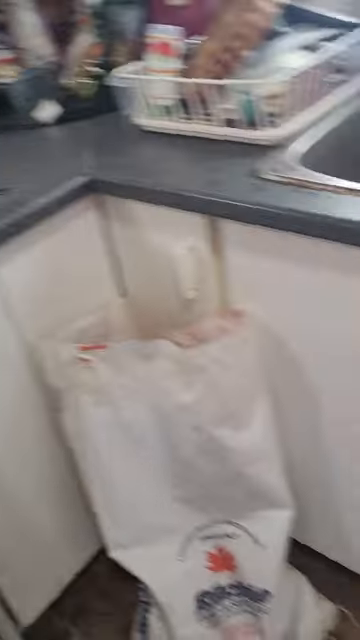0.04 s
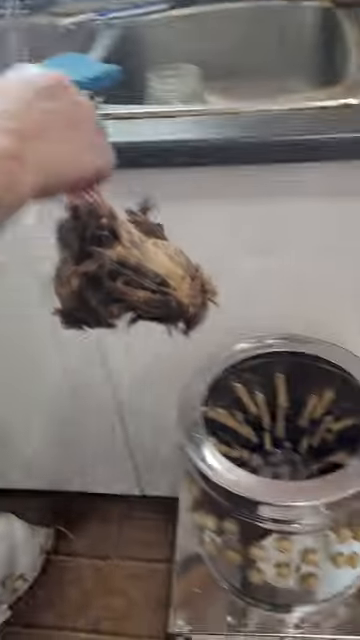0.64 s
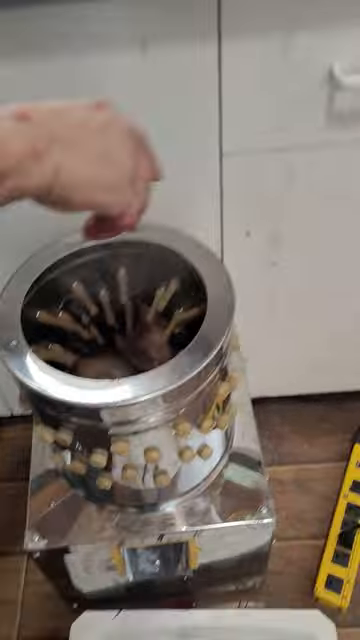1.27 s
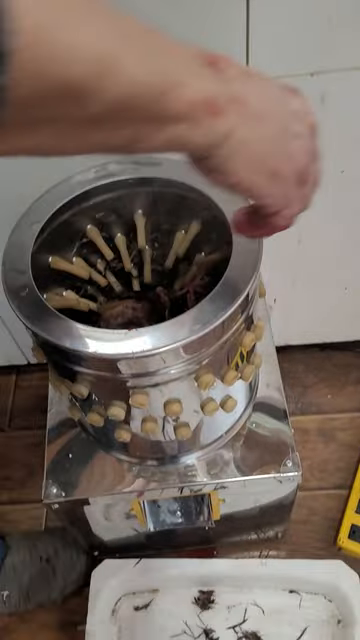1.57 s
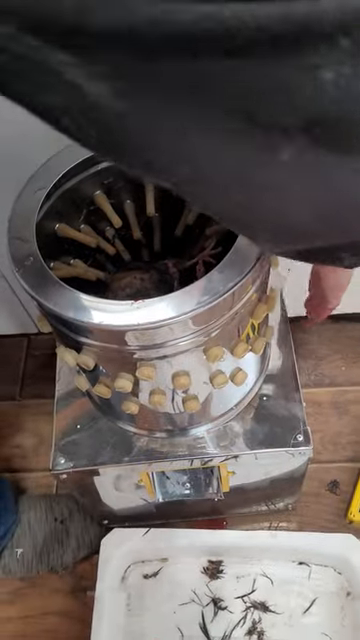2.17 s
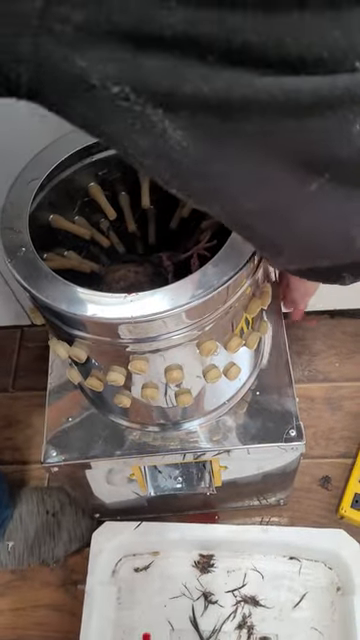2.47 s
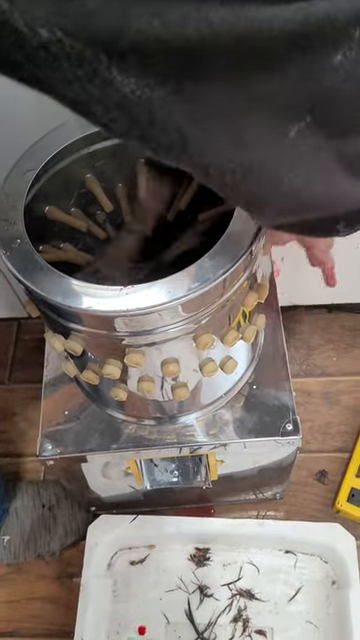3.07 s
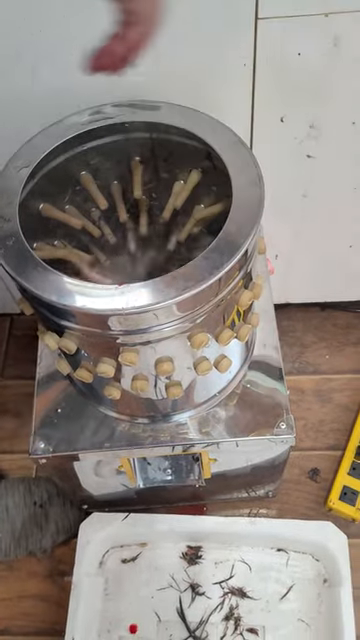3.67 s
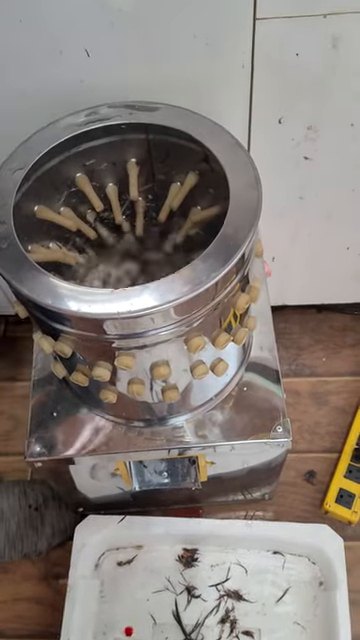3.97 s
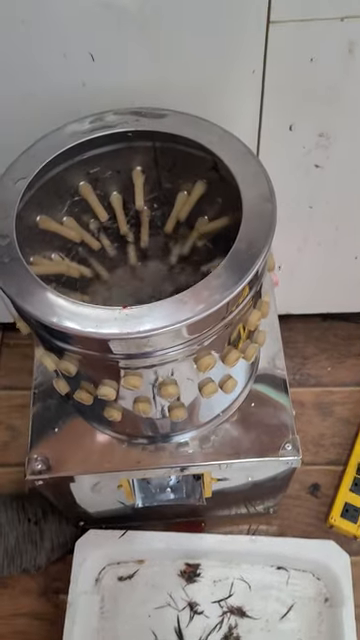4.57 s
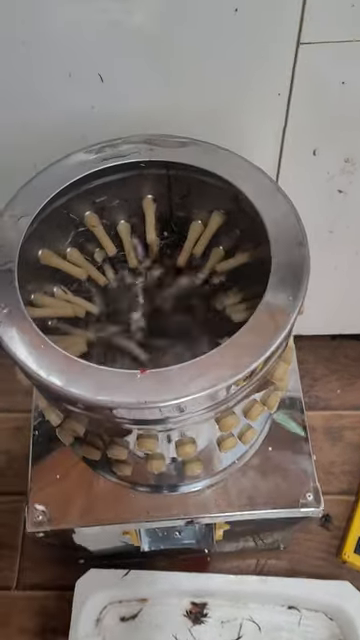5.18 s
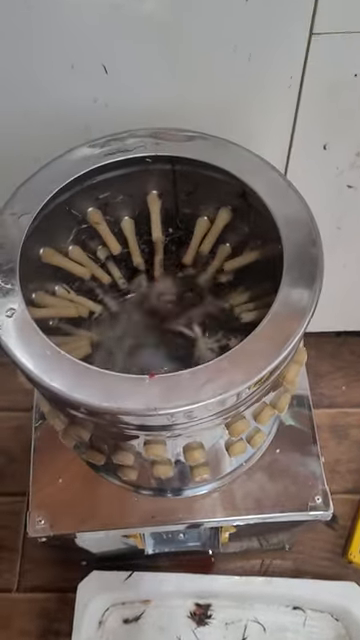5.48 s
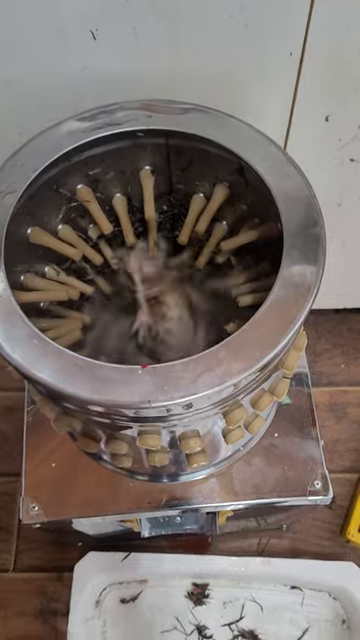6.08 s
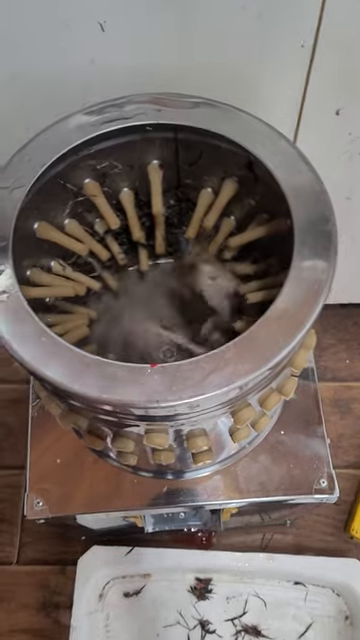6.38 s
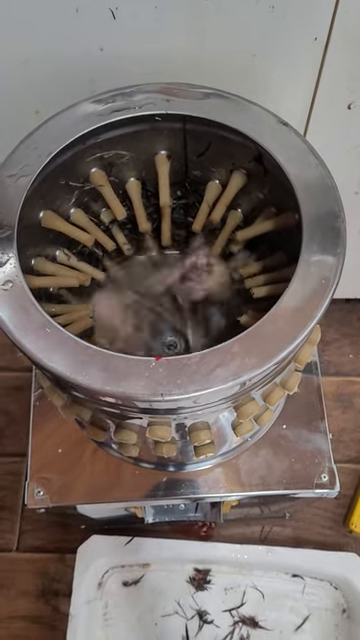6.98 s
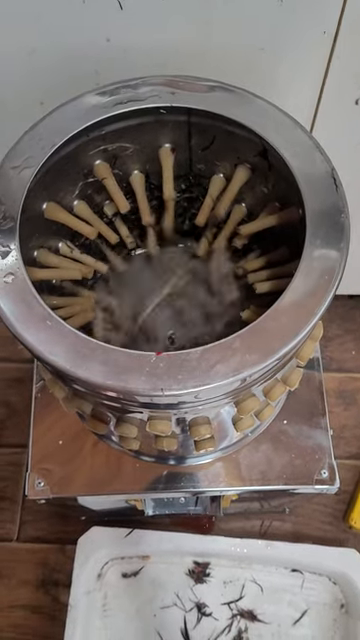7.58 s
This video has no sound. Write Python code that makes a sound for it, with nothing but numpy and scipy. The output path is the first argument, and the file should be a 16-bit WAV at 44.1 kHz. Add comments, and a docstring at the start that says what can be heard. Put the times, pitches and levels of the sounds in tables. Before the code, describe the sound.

From the start, a kitchen tap runs softly into a steel sink, a splashy hiss with low drumming and a few drip ticks. Between about 1 and 2.6 seconds come soft knocks and foot shuffles as a bird is dropped into a drum plucker.

At about 2.8 seconds a switch snaps sharply with a brief ring, and the nearby motor rises almost instantly to a steady low hum. From 3 seconds, birds tumble in the steel drum, making loud, hollow, irregular thumps about four or five times a second over a low rumble, largely covering the tap. Sharp metallic ticks cluster between 3 and 3.6 seconds. Rubber fingers patter and occasionally smack, wet feathers swish in quick sweeps, and fine drops spit faintly. The thumps ease a little after 5 seconds while the rumble and whirr slowly build, still running at the end, around 8 seconds.

```python
"""Quail in a drum plucker

A tap runs into a steel kitchen sink while a quail is dropped into a small drum plucker. A switch
snaps, the induction motor hums up, and the spinning plate tumbles the wet birds. Their impacts excite
the modes of the steel drum; they rub and flick its rubber fingers and throw off drops."""
import sys
import numpy as np
from scipy import signal
from scipy.fft import rfft, irfft
from scipy.io import wavfile
from scipy.ndimage import uniform_filter1d

SR = 44100
rng = np.random.default_rng(int(sys.argv[2]) if len(sys.argv) > 2 else 0)


def waveform_to_disk(signal):
    """Save audio, clipped to [-1, 1], as 16-bit WAV at the path in sys.argv[1]."""
    frames = np.transpose(np.atleast_2d(signal))
    scaled = np.clip(frames, -1, 1) * 32767
    samples = np.round(scaled).astype(np.int16)
    wavfile.write(sys.argv[1], SR, samples)


N = 345744
TIME = np.arange(N) / SR
FREQS = np.fft.rfftfreq(N, 1 / SR)
SWITCH_ON_S, RUN_UP_S = 2.817, 0.22
RUNNING_S = np.maximum(TIME - SWITCH_ON_S, 0)


# blows on the drum, from the hand at the switch, then the birds: (time [s], relative level [dB])
THUMPS = [(2.329, -31), (2.622, -22.5), (2.829, -17.5), (3.006, -9.5), (3.026, -6), (3.105, -8),
          (3.165, -16), (3.258, -9.5), (3.483, -8), (3.56, -10), (3.735, -7), (3.945, -6.5), (4.158, -9),
          (4.181, -11), (4.385, -14), (4.439, -10), (4.628, -5.5), (4.67, -14), (4.832, -8.5), (4.89, -18),
          (4.96, -14), (5.029, -9), (5.262, -10), (5.49, -11), (5.77, -19), (6.005, -14), (6.287, -9.5),
          (6.555, -12.5), (6.72, -19), (6.845, -15), (6.932, -10), (7.165, -8.5), (7.45, -18),
          (7.575, -17.5), (7.79, -17)]
# modes of the steel drum: (frequency [Hz], relative level [dB], t60 [s])
DRUM_MODES = [(230.2, 6, 0.2), (216, -16.5, 0.13), (267, -14, 0.11), (328.6, -4, 0.082), (547, -22, .08)]

def drum_thumps(gain_db=-2.5, push_s=0.014, load_shift=0.016, detune=0.018):
    """Modal response to soft impact: a body leans into the wall, so the modes swell before decaying."""
    out, t = np.zeros(N), TIME[:SR // 3]
    hz, mode_db, t60 = np.transpose(DRUM_MODES)[:, :, None]
    envelopes = amp(mode_db - 60 * t / t60) * (1 - np.exp(-(t / push_s) ** 2))
    envelopes /= envelopes[0].max()
    for start, db in THUMPS:
        chance = rng.standard_normal((len(DRUM_MODES) + 1, 1))
        shift = 1 + load_shift * chance[0] + detune * chance[1:]  # the bird's weight and place
        modes = envelopes * np.sin(2 * np.pi * hz * (start + t * shift))
        add(out, start, amp(db + gain_db) * modes.sum(0))
    return out


# spectrum of the shaking drum: (frequency [Hz], level [dB])
RUMBLE_SPECTRUM = [(25, -21.5), (45, -31), (60, -0.5), (86, 1), (98, -3), (130, 6), (145, 0), (192, 4.5),
                   (226, 10.5), (275, 4), (310, -0.5), (380, -11), (600, -44.5)]

def drum_rumble(rumble_db=-22.5, jolt_db=-27):
    """Forced vibration: tumbling birds shake the drum; the base kicks as the motor takes current."""
    jolt = swells([(SWITCH_ON_S + 0.031, 0.02, jolt_db)], rise_s=0.019, fall_s=0.08)
    shaking = amp(rumble_db) * plate_drive(steepness=1.8, fling_db=0, build_db_per_s=0.68)
    impacts = shot_noise(per_s=240, spread_db=2, t60=0.011, reverb=2.6)
    return colour(impacts, RUMBLE_SPECTRUM) * (shaking + jolt)


# spectrum of the battered rubber fingers: (frequency [Hz], level [dB])
PATTER_SPECTRUM = [(200, -16), (340, -8.5), (385, 0), (450, 0.5), (570, 2.5), (660, -5), (800, -4.5),
                   (930, -5), (1100, -10), (1500, -12.5), (2200, -19), (5000, -39.5)]
# drum modes kept ringing by the spinning plate: (frequency [Hz], width [Hz], relative level [dB])
WHIRR_MODES = [(461.5, 18, -23), (554, 37, -18), (796, 23, -16.5), (872, 26, -14), (918, 30, -10.5),
               (1147, 18, -20.5), (1380, 8.7, -20.5), (1854, 39, -22.5)]

def finger_patter(patter_db=-31.5, whirr_build_s=3):
    """Random impact excitation: birds batter the fingers while the drum's ringing builds."""
    patter = colour(shot_noise(per_s=500, spread_db=1.5, t60=0.02, reverb=1.7), PATTER_SPECTRUM)
    whirr = resonance(WHIRR_MODES) * np.minimum(RUNNING_S / whirr_build_s, 1)
    battering = amp(patter_db) * plate_drive(steepness=1.8, fling_db=4, build_db_per_s=0.69)
    return (patter + whirr) * battering


# a bird sweeps the fingers four or five times a second: (time [s], hold [s], relative level [dB])
SWIPES = [(3.08, 0.069, -34.5), (3.33, 0.037, -39), (3.56, 0.019, -34.5), (3.99, 0.039, -36.5),
          (4.21, 0.023, -34), (4.38, 0.072, -39), (4.59, 0.03, -37), (4.86, .03, -35), (4.98, 0.13, -38),
          (5.2, 0.03, -33.5), (5.33, .02, -35.5), (5.56, 0.023, -37.5), (5.77, 0.036, -34.5),
          (5.9, .07, -34), (6.11, 0.063, -35), (6.33, 0.076, -36.5), (6.55, 0.045, -33.5),
          (6.76, 0.044, -34), (6.99, 0.022, -33.5), (7.19, .08, -32.5), (7.42, 0.033, -36),
          (7.64, 0.022, -37), (7.82, .02, -37.5)]
# spectrum of wet feathers on rubber: (frequency [Hz], level [dB])
SCRUB_SPECTRUM = [(700, -9.5), (1800, 2), (2600, 1.5), (4000, -0.5), (5600, 2.5), (7000, 6), (7700, -1),
                  (8500, -16), (10300, -11.5), (11700, -30), (13500, -28), (15800, -22)]

def feather_scrub(scrub_db=-41, swipe_db=-1):
    """Friction noise: the many tiny contacts of wet feathers on rubber swell with each sweep."""
    steady = amp(scrub_db) * plate_drive(steepness=3, fling_db=3, build_db_per_s=0.88)
    sweeps = amp(swipe_db) * swells(SWIPES, rise_s=0.069, fall_s=0.077)
    contacts = shot_noise(per_s=450, spread_db=1.7, t60=0.02, reverb=2.4)
    contacts = flicker(contacts, depth_db=0.8, patch_s=0.02, patch_hz=596)
    return colour(early_echoes(contacts), SCRUB_SPECTRUM) * np.hypot(steady, sweeps)


def motor(hum_hz=119.97, rotor_hz=115.4, hum_db=-22.5, stalled_db=-40, rotor_db=-14, octave_db=-21):
    """Magnetic hum at twice the mains frequency; the slipping rotor's lower tone beats against it."""
    phase = 2 * np.pi * hum_hz * TIME
    rotor_cycles = np.cumsum(rotor_hz + 0.31 * wander(hz=3)) / SR + rng.random()
    rotor = amp(rotor_db) * np.sin(2 * np.pi * rotor_cycles)
    hum = (np.sin(phase) + amp(octave_db) * np.sin(2 * phase) + rotor) * (1 + 0.1 * wander(hz=20))
    stalled = amp(stalled_db) * (TIME > SWITCH_ON_S)
    running = amp(hum_db) * plate_drive(steepness=13, fling_db=1.5, build_db_per_s=0)
    return np.sqrt(2) * hum * np.hypot(stalled, running)


# drops and claws striking steel: (time [s], relative level [dB], ring frequency [Hz])
TICKS = [(.166, -28.5, 4400), (0.472, -30, 7000), (.945, -34, 3100), (1.309, -36, 6060), (1.709, -35, 1320),
         (3.05, -24, 6800), (3.183, -24.5, 6130), (3.324, -24.5, 1540), (3.608, -23, 5770),
         (4.223, -30, 6750), (4.56, -28.5, 3000), (6.982, -30, 7000)]
# spectrum of a tick's body: (frequency [Hz], level [dB])
TICK_SPECTRUM = [(600, 6), (1500, -2), (4000, -6.5), (6000, 7), (7000, 14), (8300, -7), (11000, -18.5),
                 (15800, -33)]

def steel_ticks(body_db=-5, ring_db=-3, snap_db=-9, width_ratio=1.15):
    """Hard impact: brief contact gives a snap, a short body and a cluster of modes around one pitch."""
    out = np.zeros((2, N))
    for start, db, hz in TICKS:
        cluster = [(hz / 2, -50), (hz / width_ratio, -20), (hz, 0),
                   (hz * width_ratio, -20), (hz * 2, -50)]
        body = amp(body_db) * burst(TICK_SPECTRUM, t60=0.06, room_db=-15)
        ring = amp(ring_db) * burst(cluster, t60=0.074, room_db=-15)
        add(out, start, amp(db) * (body + ring + amp(snap_db) * crack(t60=0.016)))
    return out


# rubber fingers springing back: (time [s], level [dB])
SMACKS = [(3.05, -29), (3.607, -28.5), (4.351, -29), (4.5608, -26.5), (4.847, -28), (5.221, -27),
          (5.228, -29.5), (5.302, -33), (5.649, -29.5), (6.104, -31), (6.571, -27)]
# spectrum of a smack: (frequency [Hz], level [dB])
SMACK_SPECTRUM = [(600, -2), (1500, 7.5), (2900, 0.5), (4500, -1.5), (6000, -2), (7100, 7.5), (8300, -10),
                  (11000, -14.5), (15800, -14)]

def finger_smacks(hold_s=0.0031, t60=0.02, room_db=-15, room_t60=0.12):
    """Elastic recoil: a bent finger slaps back with milliseconds of broadband noise and no ring."""
    out, t = np.zeros((2, N)), TIME[:SR // 4]
    direct = amp(-60 * np.maximum(t - hold_s, 0) / t60)
    envelope = np.hypot(direct, amp(room_db - 60 * t / room_t60))
    for start, db in SMACKS:
        add(out, start, amp(db) * envelope * noise(SMACK_SPECTRUM, len(t)))
    return out


# the switch snaps and its contacts close: (time [s], level [dB], t60 [s])
SWITCH_CLICKS = [(2.817, -22.5, 0.032), (2.8245, -28, 0.34), (2.833, -25.5, 0.23)]
# spectrum of a click: (frequency [Hz], level [dB])
SWITCH_SPECTRUM = [(240, -29), (400, -1), (976, -0.5), (1350, -10), (1600, -7), (2610, -5), (2820, -8),
                   (3780, -7.5), (5220, -14), (6470, -6), (12500, -20), (15800, -27)]
# modes of the switch housing: (frequency [Hz], relative level [dB], t60 [s])
HOUSING_MODES = [(530, 3, 0.31), (1610, 6, 0.21), (2590, -3, .15), (3050, -8, .15), (3950, 2, .14),
                 (4339, -2, .14), (7960, 8, 0.085), (10420, 5, 0.094)]

def switch(crack_db=-19, ring_db=-35):
    """Impulse excitation: the switch cracks over, rattles shut and leaves its housing ringing."""
    out, t = np.zeros((2, N)), TIME[:SR // 2]
    for start, db, t60 in SWITCH_CLICKS:
        add(out, start, amp(db) * burst(SWITCH_SPECTRUM, t60, room_db=-11, room_t60=0.37))
    ring = sum(amp(db - 60 * t / t60) * np.sin(2 * np.pi * (hz * t + rng.random((2, 1))))
               for hz, db, t60 in HOUSING_MODES)
    add(out, SWITCH_ON_S, amp(ring_db) * ring + amp(crack_db) * crack(t60=0.026))
    return out


# the tap fades as the listener turns away and a body comes between:
# (time [s], relative splash level [dB], relative drumming level [dB])
TAP_LEVELS = [(0.0, -36.5, -44), (0.75, -40, -43.5), (1.7, -41, -42.5), (2.15, -42.7, -47),
              (2.75, -42.5, -44.5)]
# spectrum of the splash: (frequency [Hz], level [dB])
SPLASH_SPECTRUM = [(290, -39), (520, -11.5), (700, -20), (1050, -17.5), (1450, -12), (2700, -10),
                   (4100, -9.5), (5900, -9.5), (7000, -4.5), (8500, -14.5), (10300, -10.5), (11800, -15.5),
                   (13300, -19.5), (15800, -18.5)]
# spectrum of the drumming sink: (frequency [Hz], level [dB])
SINK_SPECTRUM = [(18, -61), (30, -35), (59, -7.5), (150, -8), (173, -1), (202, -7), (265, 0.5), (372, -2),
                 (488, -12.5), (900, -17.5), (1170, -18), (1980, -120)]
# basin modes and faint valve whistles: (frequency [Hz], width [Hz], relative level [dB])
BASIN_MODES = [(182, 8, -18), (554.6, 6.9, -17.5), (1415, 35, -21), (2385, 64, -21.5), (4120, 65, -19),
               (6820, 240, -12.5), (11000, 25, -21), (11629, 11, -44), (13342, 15, -37), (15692, 15, -29)]

def tap(splash_db=2, sink_db=1):
    """Jet impact: water splashes, drums on the basin and keeps its steel resonating."""
    times, splash_curve, sink_curve = np.transpose(TAP_LEVELS)
    drops = shot_noise(per_s=1500, spread_db=0.2, t60=0.015, reverb=1)
    drops = flicker(drops, depth_db=2, patch_s=0.028, patch_hz=500)
    splash = amp(splash_db) * colour(early_echoes(drops), SPLASH_SPECTRUM)
    drumming = noise(SINK_SPECTRUM) * amp(sink_db + np.interp(TIME, times, sink_curve))
    return (splash + resonance(BASIN_MODES)) * amp(np.interp(TIME, times, splash_curve)) + drumming


# feet and body shifting on the floor: (time [s], hold [s], relative level [dB])
SHUFFLES = [(1.335, 0.1, -32.5), (1.49, .02, -43), (1.595, 0.047, -32), (1.72, .01, -44), (1.88, .03, -45),
            (2.04, .02, -48)]
# spectrum of a shuffle: (frequency [Hz], level [dB])
SHUFFLE_SPECTRUM = [(15, -46), (25, -23), (130, 5), (162, -19), (226, -1), (334, -19), (474, -24),
                    (700, -29), (910, -55), (1540, -120)]
# feathers brushing down the fingers: (time [s], hold [s], level [dB])
BRUSHES = [(1.148, 0.017, -36.5)]
# the bird goes in and a hand finds the housing: (time [s], level [dB], t60 [s])
KNOCKS = [(.596, -38, 0.036), (1.098, -30, 0.09), (1.505, -27.5, .06), (1.71, -46, .04),
          (2.038, -38, 0.054), (2.345, -33.5, 0.052)]
# spectrum of a soft knock: (frequency [Hz], level [dB])
KNOCK_SPECTRUM = [(30, -18), (70, 0), (300, 6.5), (600, -5), (1400, -11), (3000, -18), (9000, -44)]

def loading(shuffle_db=-1):
    """Sliding friction and damped impact: feet shift while the bird slips in and settles."""
    out = amp(shuffle_db) * noise(SHUFFLE_SPECTRUM) * swells(SHUFFLES, rise_s=0.04, fall_s=0.11)
    contacts = shot_noise(per_s=460, spread_db=0, t60=0.0042, reverb=1)
    feathers = colour(contacts, [(400, -10), (1200, -3), (3500, 0), (6000, -14), (12000, -25)])
    out += feathers * swells(BRUSHES, rise_s=0.081, fall_s=0.053)
    for start, db, t60 in KNOCKS:
        add(out, start, amp(db) * burst(KNOCK_SPECTRUM, t60, room_db=-7.5))
    return out


def spray(spray_db=-55):
    """Droplet impact: once the plate is at speed, fine drops fly off and spit against the wall."""
    drops = shot_noise(per_s=22, spread_db=6.5, t60=0.011, reverb=0.26)
    spits = colour(drops, [(1500, 2), (4000, 10), (7000, -2), (9000, -5), (15800, -19)])
    return amp(spray_db) * spits * (RUNNING_S > RUN_UP_S)


def plate_drive(steepness, fling_db, build_db_per_s, settle_s=0.37):
    """Power law of plate speed, with a surge at the first fling and a build as birds lose feathers."""
    speed = np.minimum(RUNNING_S / RUN_UP_S, 1)
    fling = np.exp(-np.maximum(RUNNING_S - RUN_UP_S, 0) / settle_s)
    return speed ** steepness * amp(fling_db * fling + build_db_per_s * RUNNING_S)


def shot_noise(per_s, spread_db, t60, reverb, room_t60=0.36):
    """Poisson process: tiny impacts add in power, each a short burst with a reverberant tail."""
    sizes = amp(spread_db * np.minimum(rng.exponential(1, N), 4))
    hits = sizes ** 2 * (rng.random(N) < per_s / SR)
    t = TIME[:SR // 3]
    direct, tail = amp(-60 * t / t60) ** 2, amp(-60 * t / room_t60) ** 2
    power = signal.fftconvolve(hits, direct / direct.sum() + reverb * tail / tail.sum())[:N]
    return np.sqrt(abs(power)) * rng.standard_normal((2, N))


def burst(spectrum, t60, room_db, room_t60=0.62):
    """High modal density: one impact sounds as decaying noise, followed by reverberation."""
    t = TIME[:SR // 2]
    return noise(spectrum, len(t)) * np.hypot(amp(-60 * t / t60), amp(room_db - 60 * t / room_t60))


def crack(t60):
    """Contact transient: two hard bodies meet in milliseconds of bright noise."""
    t = TIME[:SR // 2]
    bright = noise([(1000, -14), (4000, -3), (7800, 6), (9000, -5), (15800, 2)], len(t))
    return bright * amp(-60 * t / t60)


def resonance(modes):
    """Randomly driven modes: countless small hits sustain a narrow band of noise at each."""
    power = sum(amp(db) ** 2 / width / (1 + (2 * (FREQS - hz) / width) ** 2) ** 2
                for hz, width, db in modes)
    return irfft(rfft(rng.standard_normal((2, N))) * np.sqrt(power * 2 * SR / np.pi), N)


def early_echoes(pair):
    """Comb filtering: reflections from cupboards and steel walls ripple the spectrum."""
    response = np.zeros((2, SR // 50))
    delays = rng.integers(SR // 1000, response.shape[1], (2, 10))
    np.put_along_axis(response, delays, 0.1 * rng.choice([-1, 1], delays.shape), 1)
    response[:, 0] = 1
    return signal.fftconvolve(pair, response, axes=1)[:, :N]


def flicker(pair, depth_db, patch_s, patch_hz):
    """Random amplitude modulation in small patches of time and frequency makes the hiss flicker."""
    frames = signal.stft(pair, nperseg=256)[2]
    field = rng.standard_normal(frames.shape[:0:-1]).T
    for _ in range(2):
        field = uniform_filter1d(field, max(1, round(patch_hz * 256 / SR)), axis=0)
        field = uniform_filter1d(field, max(1, round(patch_s * SR / 128)), axis=1)
    return signal.istft(frames * amp(depth_db * unit(field)), nperseg=256)[1][:, :N]


# likeness of the room's sound at the two ears: (frequency [Hz], correlation [1])
COHERENCE = [(30, 1), (70, 0.89), (170, 1), (350, 0.8), (700, 0.55), (1400, 0), (2800, 0), (16000, 0)]

def colour(pair, spectrum):
    """Spectral shaping to rms 1, with interaural coherence: the bass is alike in both ears."""
    size = pair.shape[1]
    hz = np.fft.rfftfreq(size, 1 / SR)
    mid, side = rfft(pair) * amp(curve_at(spectrum, hz)) * hz / (hz + 10)
    coherence = curve_at(COHERENCE, hz)
    mid, side = mid * np.sqrt(1 + coherence), side * np.sqrt(1 - coherence)
    return unit(irfft(np.array([mid + side, mid - side]), size))


def noise(spectrum, size=N):
    """Filtered Gaussian noise in stereo."""
    return colour(rng.standard_normal((2, size)), spectrum)


def wander(hz):
    """Low-pass noise: a slow drift of rms 1, up to about hz."""
    return unit(irfft(rfft(rng.standard_normal(N)) * np.exp(-(FREQS / hz) ** 2), N))


def swells(rows, rise_s, fall_s):
    """Trapezoidal envelopes: each stroke reaches its level at its time, holds and falls away."""
    return sum(amp(db) * np.interp(TIME, [s - rise_s, s, s + hold, s + hold + fall_s], [0, 1, 1, 0])
               for s, hold, db in rows)


def add(mix, start_s, sound):
    """Superposition: mixes a sound in at its start time."""
    part = mix[..., round(start_s * SR):][..., :sound.shape[-1]]
    part += sound[..., :part.shape[-1]]


def curve_at(points, hz):
    """Interpolation on a log-frequency axis."""
    point_hz, values = np.transpose(points)
    return np.interp(np.log(hz + 1), np.log(point_hz), values)


def amp(db):
    """Decibels to amplitude ratio."""
    return 10 ** (np.asarray(db) / 20)


def unit(x):
    """Normalisation to rms 1."""
    return x / np.sqrt(np.mean(x ** 2) + 1e-20)


def scene():
    """Superposition: the sounds of sink and plucker add as pressures."""
    return (tap() + loading() + switch() + motor() + drum_thumps() + drum_rumble() + finger_patter()
            + feather_scrub() + spray() + steel_ticks() + finger_smacks())


# stereo balance: (frequency [Hz], left minus right level [dB])
BALANCE = [(40, -1), (100, -2.5), (200, -0.7), (350, -2.5), (700, 0.5), (1400, -2.5), (2800, 0.9),
           (5600, 2.5), (10000, -1.5), (14000, 2)]

def record(dry):
    """Interaural level difference colours the two sides; a low-pass filter limits the band."""
    tilted = irfft(rfft(dry) * amp(np.outer([0.5, -0.5], curve_at(BALANCE, FREQS))), N)
    lowpass = signal.firwin(511, cutoff=15900, window=("kaiser", 9), fs=SR)
    return signal.oaconvolve(tilted, lowpass[None], "same")


dry = scene()
out = record(dry)
waveform_to_disk(out)
```